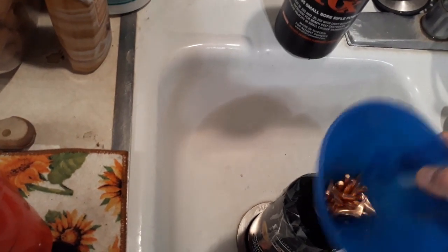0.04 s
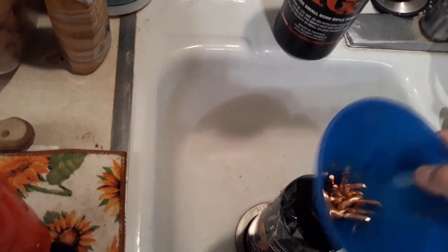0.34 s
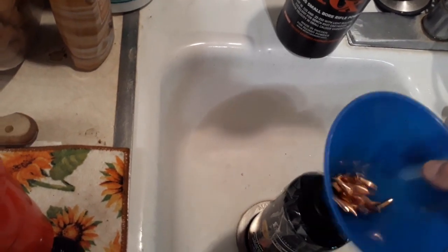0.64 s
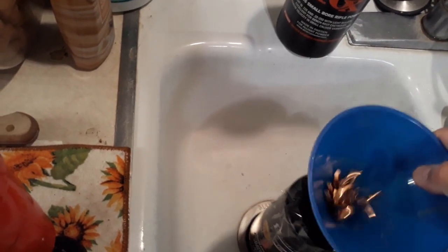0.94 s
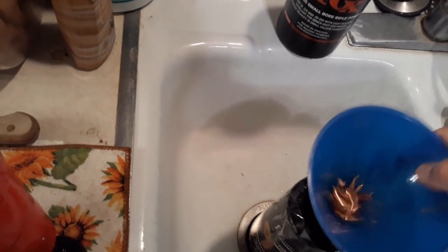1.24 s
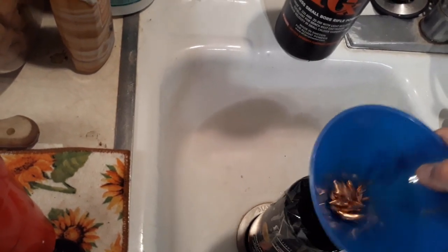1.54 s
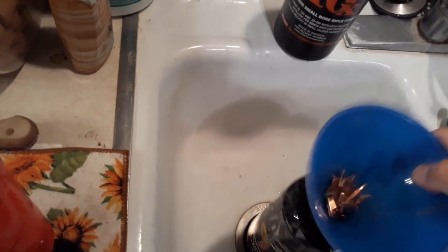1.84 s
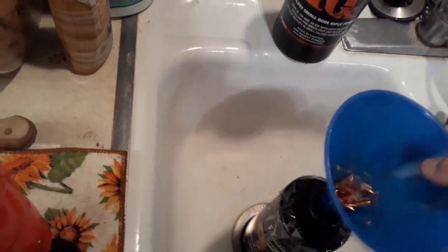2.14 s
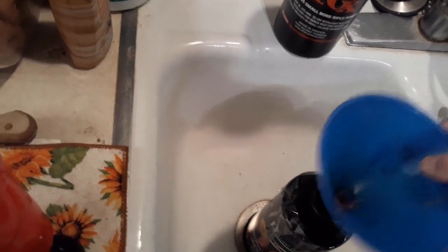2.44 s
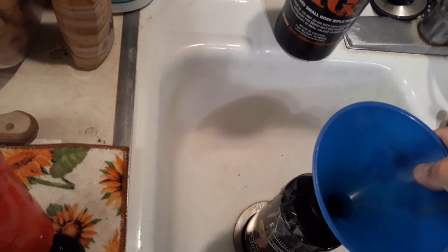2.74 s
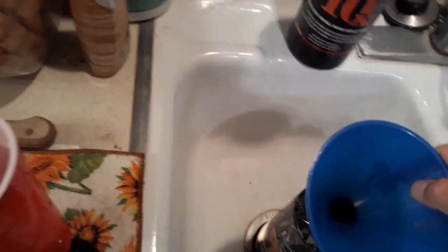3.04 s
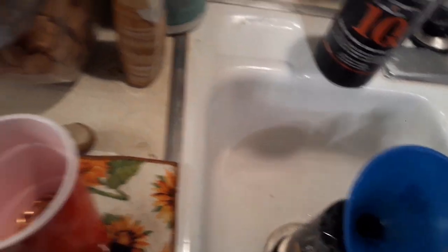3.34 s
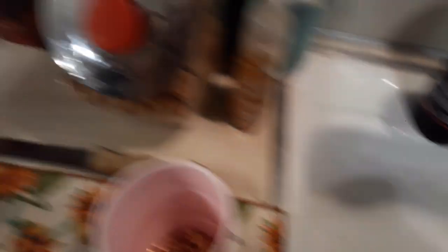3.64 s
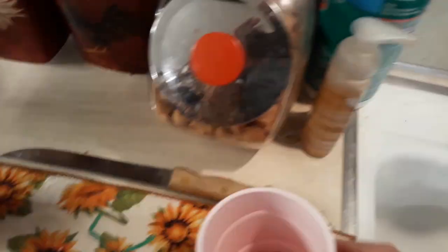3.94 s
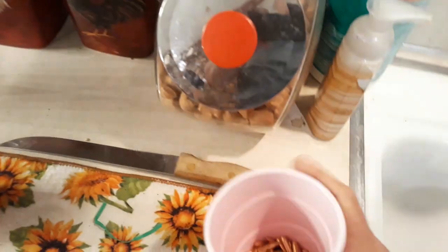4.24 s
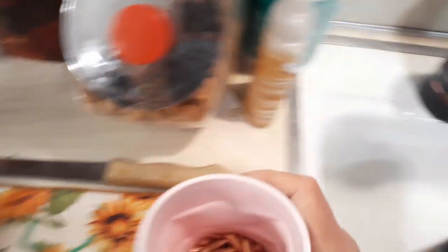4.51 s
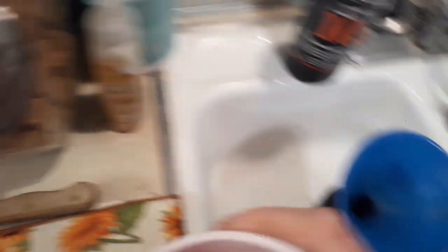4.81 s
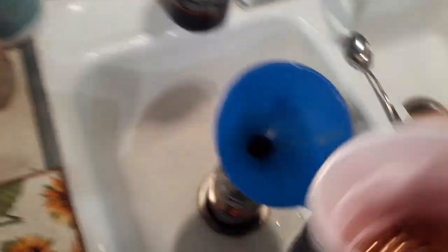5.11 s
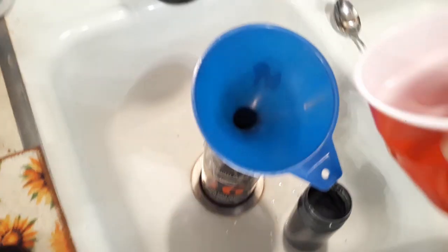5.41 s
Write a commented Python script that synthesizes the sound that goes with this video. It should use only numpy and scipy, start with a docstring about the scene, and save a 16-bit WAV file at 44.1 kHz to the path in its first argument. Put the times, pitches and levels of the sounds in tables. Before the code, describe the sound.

Small copper bullets are shaken in a plastic funnel about six times a second, rattling and clinking as some drop through and thump into a plastic bottle. The last ones stream out and the empty funnel gives a dull knock. After a short pause, a thin plastic cup is picked up, rustling, creaking and popping sharply. The microphone is close, over a sink in a quiet kitchen.

```python
"""A plastic funnel full of small copper bullets is shaken about six times a second over a plastic bottle
in a kitchen sink. Each shake throws the heap against the funnel's wall; bullets slip through the spout
and thump into the bottle until the funnel is empty. Then a hand picks up a thin plastic cup, which
rustles, creaks and pops as its wall buckles. A phone hears it from close by in a quiet room."""
import sys
import numpy as np
from scipy import signal
from scipy.fft import rfft, irfft, next_fast_len
from scipy.io import wavfile
from scipy.ndimage import uniform_filter1d

SR = 44100
rng = np.random.default_rng(int(sys.argv[2]) if len(sys.argv) > 2 else 0)


def dump(signal):
    """Clip the signal to [-1, 1] and save it as 16-bit WAV at the path in sys.argv[1]."""
    limited = np.clip(np.atleast_2d(signal).T, -1, 1)
    pcm = np.round(limited * 32767).astype(np.int16)
    wavfile.write(sys.argv[1], SR, pcm)


N = 245637
TIME = np.arange(N) / SR
RING_TIME = TIME[:16384]  # time axis of one short sound
EMPTYING_S, CUP_LIFTED_S = 2.22, 4.9  # the heap starts to stream out; the cup leaves its mat
PEAK_WIDTHS = 1.35  # a shake is loudest this many half lengths after its start
# a ring time (t60) is the seconds a sound takes to fade by 60 dB
TOUCH_T60, KNOCK_T60 = .026, .04

# shakes of the funnel (start [s], level [dB], half length [s], slap on the wall [dB])
SHAKES = [(0.015, -16, 0.017, -5), (.157, -19, 0.021, -1.5), (0.302, -16, 0.015, -27),
          (.466, -19, 0.021, -11.5), (0.622, -17.5, 0.023, -6.5), (.779, -17, 0.021, -4.5),
          (.955, -18, 0.021, -7), (1.116, -23, 0.031, -6), (1.298, -17, 0.023, -26.5),
          (1.437, -21.5, 0.036, -6), (1.616, -22, .019, -11), (1.759, -22, .022, -4.5),
          (1.939, -17.5, 0.021, -2.5), (2.097, -18, 0.035, -19), (2.281, -17, 0.028, -10.5),
          (2.488, -19.5, .036, -2), (2.634, -21, 0.019, -8)]
# bullets landing in the bottle (time [s], thump [dB], clack on the bullets inside [dB])
LANDINGS = [(0.159, -22.5, -20.5), (0.213, -33, -9.5), (.775, -25, -20), (1.116, -23, -26.5),
            (1.264, -33.5, -7.5), (2.099, -26, -17.5), (2.244, -32.5, -9.5), (2.274, -25.5, -18.5),
            (2.354, -26, -19.5), (2.402, -26, -1.5), (2.461, -26.5, -12.5), (2.553, -28, -19),
            (2.592, -22.5, -12.5), (2.662, -23, -8.5), (2.734, -36, -3), (2.777, -37.5, -11.5),
            (2.841, -29, -6.5), (2.886, -29, -14), (2.903, -35.5, -11)]
# the cup's wall buckles (time [s], level [dB], pitch [Hz], crack compared with the pop [dB])
POPS = [(4.541, -7, 742, 13.5), (4.672, -30.5, 735, 6.5), (5.211, -9, 768.5, -6.5), (5.267, -7.5, 755, 0.5),
        (5.523, -3, 786, 8)]
# tone of a dull knock on the bottle (frequency [Hz], level [dB])
BUMP_SPECTRUM = [(50, -5), (120, -10.5), (180, 7), (350, 0), (560, -1), (1300, -3.5), (2000, -9),
                 (3500, -3), (7000, -21.5), (9000, -37.5), (15500, -33)]
# tone of rubbing on the cup (frequency [Hz], level [dB])
RUB_SPECTRUM = [(100, -23), (480, -12.5), (750, 8.5), (950, -2), (1250, -7), (1800, 4), (2700, 3),
                (4000, 10.5), (7200, -0.5), (8800, -17), (15500, -10.5)]


def funnel(rest_per_s=1100, shake_per_s=1900, glints_per_s=700, heap_db=1.12, clack_db=12.5,
           tick_db=-13, wall_db=-14, clink_db=-8, chatter_db=-7, sparkle_db=-13):
    """Bullets tick and clink on each other and ring the wall; fast throws add a metallic sparkle."""
    # tone of the rattle (frequency [Hz], level [dB])
    rattle_spectrum = [(140, -25), (220, -1), (450, -1.5), (600, 0), (740, -5), (1000, 5), (1300, 1),
                       (1650, -3.5), (2300, 5), (3600, 6), (5600, -0.5), (7100, 2), (8600, -16),
                       (11000, -13.5), (15500, -8.5)]
    # tone of copper striking copper (frequency [Hz], level [dB])
    copper_spectrum = [(6000, -52.5), (9000, -10), (12000, -4.5), (15500, 2)]
    throw = swells([(s + PEAK_WIDTHS * width, db, width) for s, db, width, _ in SHAKES])
    speed = throw / throw.max()
    level = np.sqrt(throw + rolling() ** 2)
    heap = undb(heap_db) * contacts(rest_per_s + shake_per_s * speed, level, even_s=0.02)
    knocks = undb(clack_db) * hard_knocks()
    hits = heap + knocks
    # the faster the throw, the more the metal itself rings
    pings = clinks(heap * (.5 + np.sqrt(speed)))
    rattle = undb(tick_db) * hits + undb(wall_db) * funnel_wall(hits) + undb(clink_db) * pings
    rattle += undb(chatter_db) * chatter(heap, TOUCH_T60) + chatter(knocks, KNOCK_T60)
    glints = contacts(glints_per_s, level * np.sqrt(speed), even_s=0.025)
    sparkle = clinks(glints, lo_hz=9700, hi_hz=16500, phase_spread=0.52, t60=0.055)
    return shaped(rattle, rattle_spectrum) + undb(sparkle_db) * shaped(sparkle, copper_spectrum)


def rolling(roll_db=-12.5, lag_s=0.085, flow_db=-36.5, empty_s=2.91, settle_db_per_s=118.5):
    """Level of the bullets that roll on after each shake, then stream out and settle in the bottle."""
    shake_db = np.interp(TIME - lag_s, [row[0] for row in SHAKES], [row[1] for row in SHAKES])
    moving = np.hypot(undb(shake_db + roll_db), undb(flow_db) * (TIME > EMPTYING_S))
    return moving * undb(-settle_db_per_s * np.maximum(TIME - empty_s, 0))


def hard_knocks(count=4, slap_s=.004):
    """A few bullets slap the wall in a row as a shake starts; stray and landing ones clack singly."""
    # stray bullets fly up and knock on the funnel (time [s], level [dB])
    strays = [(.76, -16), (.823, -3.5), (.922, -15.5), (1.151, -5), (1.167, -4.5), (1.499, -3), (1.826, -6),
              (1.923, -12), (2.498, -1.5), (2.53, -7.5), (2.688, -14.5)]
    lags = slap_s * (np.arange(count) + rng.random((len(SHAKES), count)) / 2) / count
    slaps = [(s + lag, db - 10 * np.log10(count))
             for (s, _, _, db), row in zip(SHAKES, lags) for lag in row]
    return strikes(slaps + [(s, db) for s, _, db in LANDINGS] + list(strays))


def funnel_wall(hits, side_db=-5, places=10):
    """Each shake lands the heap on different places of the wall, each with its own mix of notes."""
    # notes of the funnel's wall (pitch [Hz], ring time [s], level [dB])
    notes = [(850, 0.055, -17), (941, 0.032, -8.5), (1055, 0.016, -15.5), (1275, 0.029, -10.5),
             (1533, 0.46, -20), (2320, 0.047, -18.5), (2556, 0.079, -10.5), (2863, 0.069, -7),
             (3410, .025, -5.5), (3680, 0.03, -3.5), (4090, 0.031, -3), (4555, 0.052, -5.5),
             (4750, .07, -10.5)]
    shake = np.searchsorted([row[0] for row in SHAKES], TIME)
    place = (3 * shake + rng.integers(0, 4, N)) % places
    out = 0
    for k in range(places):
        # the far side of the wall reaches the two ears out of step
        near, far = (ring(notes, detune=0.013, scatter_db=2, wave=wave) for wave in (np.cos, np.sin))
        out = out + convolve(hits * (place == k), both_ears(near, far, side_db))
    return out


def clinks(hits, lo_hz=2700, hi_hz=7500, phase_spread=0.7, uneven_db=4, t60=0.048, size=1280):
    """Each collision rings briefly at a pitch of its own, from its own place in the heap."""
    starts = np.flatnonzero(hits)
    pitches = lo_hz * (hi_hz / lo_hz) ** rng.random((len(starts), 1))
    phases = phase_spread * rng.standard_normal((len(starts), 2, 1))
    # a free bullet rings out, one wedged in the heap hardly does
    freedom = unit(undb(uneven_db * rng.standard_normal(len(starts)))) * np.sqrt(len(starts))
    decay = np.sqrt(2) * unit(fade(t60)[:size])
    out = np.zeros((2, N + size))
    for i, hz, phase, free in zip(starts, pitches, phases, freedom):
        tone = np.sin(np.float32(2 * np.pi * hz * RING_TIME[:size] + phase))
        out[:, i:i + size] += hits[i] * free * decay * tone
    return out[:, :N]


def spout(push_db=3, return_db=-1.5, return_s=.062, passing_db=13, scatter_db=3):
    """Bullets tap the narrow spout as each shake starts, on the swing back, and as they stream out."""
    # dull notes of the spout (pitch [Hz], ring time [s], level [dB])
    notes = [(319, 0.11, 1.5), (460, 0.017, -2.5), (574, 0.0718, 1)]
    taps = [(s, db + passing_db) for s, db, _ in LANDINGS if s > EMPTYING_S]
    scatter = scatter_db * rng.standard_normal((len(SHAKES), 2))
    for (s, db, width, _), (push_scatter, return_scatter) in zip(SHAKES, scatter):
        taps.append((s, db + push_db + push_scatter))
        taps.append((s + PEAK_WIDTHS * width + return_s, db + return_db + return_scatter))
    return convolve(strikes(taps), ring(notes))


def bottle(body_db=23.5, thud_db=5, air_db=-1, stir_db=-14, held_t60=0.9, held_pitch=.95,
           min_bounce_s=0.0086, bounce_db=-7):
    """Landing bullets thump the bottle and bounce once; some set the air inside singing."""
    # notes of the bottle's body (pitch [Hz], ring time [s], level [dB])
    body_notes = [(202, 0.12, -10.5), (224, 0.21, 3)]
    # notes of the air inside (pitch [Hz], ring time [s], level [dB])
    air_notes = [(960, .16, -5), (1400, .12, -11), (1805, .24, 0)]
    # bullets catch the neck and ring the air (time [s], level [dB])
    neck_hits = [(2.46, 3), (2.662, -2), (2.775, 2), (2.841, -4), (2.886, 1.5)]
    thumps = []
    for (s, db, _), late in zip(LANDINGS, rng.random(len(LANDINGS))):
        # the full funnel's weight lowers and shortens the notes
        pitch, damping = (held_pitch, fade(held_t60)) if s < EMPTYING_S else (1, 1)
        notes = [(hz * pitch, t60, note_db) for hz, t60, note_db in body_notes]
        for lag, gain_db in ((0, 0), (min_bounce_s * (1 + late), bounce_db)):
            thumps.append((s + lag, undb(db + gain_db) * ring(notes, detune=0.022) * damping))
    landings = strikes([(s, db) for s, db, _ in LANDINGS])
    thud = shaped(chatter(landings, t60=.07, side_db=-21), BUMP_SPECTRUM)
    # every landing also stirs the air a little
    blows = neck_hits + [(s, stir_db) for s, _, _ in LANDINGS]
    air = placed((s, undb(db) * ring(air_notes, detune=0.0027, scatter_db=-0.5)) for s, db in blows)
    return undb(thud_db) * thud + undb(body_db) * placed(thumps) + undb(air_db) * air


def funnel_bump(db=17, t60=.07):
    """The empty funnel is let go and knocks dully on the bottle's neck."""
    # the knock (time [s], level [dB])
    bumps = [(3.138, -29)]
    return undb(db) * shaped(chatter(strikes(bumps), t60), BUMP_SPECTRUM)


def cup_pops(wall_db=11, thump_db=5, crack_db=7, crack_t60=0.049, jolt_db=-5, jolt_t60=0.27):
    """The cup's thin wall snaps with a hollow pop and a crack that jolts the bullets inside."""
    # notes of the wall (multiple of the pop's pitch, ring time [s], level [dB])
    wall_notes = [(1, 0.03, 1), (1.02, .16, -14)]
    # tone of the crack (frequency [Hz], level [dB])
    crack_spectrum = [(60, -19), (300, -3.5), (480, -0.5), (720, 16), (1250, -6), (1900, 4), (3000, 1.5),
                      (3900, 5.5), (5300, 0), (7300, 1), (8900, -18.5), (15500, -16)]
    # notes of the base, on the mat and off it (pitch [Hz], ring time [s], level [dB])
    resting, lifted = [(638, 0.19, -10.5), (985, .07, -4)], [(580, 0.075, -2)]
    pops = []
    for s, db, hz, _ in POPS:
        notes = [(hz * ratio, t60, note_db) for ratio, t60, note_db in wall_notes]
        base = lifted if s > CUP_LIFTED_S else resting
        pops.append((s, undb(db) * ring(notes + base)))
    # the wall takes a moment to flip, so the pop is round; once lifted, it also thumps the hand
    wall = filtered(placed(pops), [520, 1080], "band")
    thump = filtered(strikes([(s, db) for s, db, _, _ in POPS if s > CUP_LIFTED_S]), [290, 500], "band")
    snaps = undb(crack_db) * strikes([(s, db + sharp_db) for s, db, _, sharp_db in POPS])
    # only the hardest snaps really unsettle the bullets
    jolts = snaps * np.sqrt(snaps / snaps.max())
    crack = chatter(snaps, crack_t60) + undb(jolt_db) * chatter(jolts, jolt_t60)
    return undb(wall_db) * wall + undb(thump_db) * thump + shaped(crack, crack_spectrum)


def cup_creaks(creak_db=8, gap_s=.0125, jitter_s=0.0012, scatter_db=2, detune=.02, push_s=0.0032):
    """Each creak is a nearly even run of soft slips, each a short swell of the wall's note."""
    # creaks of the wall (start [s], end [s], level [dB], pitch [Hz])
    creaks = [(5.152, 5.203, -29, 805), (5.227, 5.341, -23.5, 775), (5.363, 5.41, -33, 775)]
    push = (RING_TIME / push_s) ** 2 * np.exp(-2 * RING_TIME / push_s)
    slips = []
    for start, end, db, hz in creaks:
        for s in np.arange(start, end, gap_s):
            later, louder, higher = rng.standard_normal(3)
            note = unit(push * np.sin(2 * np.pi * hz * (1 + detune * higher) * RING_TIME))
            slips.append((s + jitter_s * later, undb(db + creak_db + scatter_db * louder) * note))
    return placed(slips)


def fingers(rub_db=-1, crinkle_db=16, grip_s=4.27, grip_db=-62.5, slips_per_s=650, slip_t60=.026):
    """Fingers stick and slip on the cup, and its wall crinkles under them."""
    # fingers slide (time [s], level [dB], half length [s])
    rubs = [(4.36, -46.5, 0.016), (4.417, -37, 0.011), (4.475, -47, 0.022), (4.58, -47, 0.027),
            (4.842, -49, 0.009), (5.38, -52.5, 0.028)]
    # the wall crinkles (time [s], level [dB])
    crinkles = [(4.276, -47), (4.292, -47), (4.349, -42), (4.367, -30.5), (4.382, -33.5), (4.408, -28.5),
                (4.462, -43), (4.523, -31), (4.906, -42), (4.932, -46.5), (5.019, -44.5)]
    holding = undb(grip_db) ** 2 * (TIME > grip_s)
    level = np.sqrt(swells(rubs, lean=0.24, edge=1.5) + holding)
    slips = undb(rub_db) * chatter(contacts(slips_per_s, level, even_s=0.04), slip_t60)
    return shaped(slips + undb(crinkle_db) * chatter(strikes(crinkles), KNOCK_T60), RUB_SPECTRUM)


def shifting_bullet(scrape_db=-7):
    """A bullet left in the cup shifts with a faint, dry clink."""
    # the bullet moves (time [s], level [dB])
    shifts = [(3.805, -41.5)]
    # notes of its clink (pitch [Hz], ring time [s], level [dB])
    notes = [(3160, .04, 0.95), (4183, .035, -0.5)]
    touch = strikes(shifts)
    clink = convolve(touch, ring(notes))
    return clink + undb(scrape_db) * shaped(chatter(touch, KNOCK_T60), RUB_SPECTRUM)


def sink(db=-2.5, cup_db=-14):
    """Sink and counter pass on each landing, and the pops of the standing cup, as a deep thud."""
    # tone of the thud (frequency [Hz], level [dB])
    thud_spectrum = [(20, -2.5), (45, -3.5), (80, -23), (160, -44), (600, -66.5)]
    blows = [(s, thump_db) for s, thump_db, _ in LANDINGS]
    blows += [(s, pop_db + cup_db) for s, pop_db, _, _ in POPS if s < CUP_LIFTED_S]
    return undb(db) * shaped(strikes(blows), thud_spectrum)


def kitchen(x, basin_db=-7.5, basin_t60=0.063, room_db=-16, room_t60=.25):
    """Sound reaches two microphones directly, then as quick basin echoes and a short room tail."""
    # how far the right microphone lags the left (frequency [Hz], phase [radians])
    phase_lags = [(1300, 0), (2300, -1.15), (3200, -2), (5000, -4), (7300, -5.5)]
    lag = np.interp(np.arange(N // 2 + 1) * SR / N, *np.transpose(phase_lags))
    # the microphones are close together, so low notes reach both alike
    side = filtered((x[0] - x[1]) / 2, 420, "high")
    x = both_ears(x.mean(axis=0), side, 0)
    direct = np.array([x[0], irfft(rfft(x[1]) * np.exp(-1j * lag), N)])
    echoes = [undb(basin_db) * burst(basin_t60) + undb(room_db) * burst(room_t60) for _ in range(2)]
    # low notes bend round the basin and are hardly thrown back
    return direct + convolve(x, filtered(echoes, 800, "high", order=1))


def room_tone(side_db=-10):
    """The low, faint rush of the kitchen, a little louder near the end."""
    # tone of the rush (frequency [Hz], level [dB])
    spectrum = [(25, -14), (55, -9), (90, -14.5), (180, -0.5), (240, -7), (320, 8.5), (450, -4),
                (700, -12.5), (2000, -25), (7000, -28), (9000, -31), (15500, -39)]
    # its loudness (time [s], level [dB])
    levels = [(0, -67), (3.6, -73.5), (4.2, -63), (4.9, -57.5), (5.57, -60)]
    noise = both_ears(*rng.standard_normal((2, N)), side_db)
    return undb(np.interp(TIME, *np.transpose(levels))) * shaped(noise, spectrum)


def contacts(per_s, level, even_s, spread_db=4.5):
    """Random impacts of uneven size that share the energy available in each moment."""
    hit = rng.random(N) < per_s / SR
    clicks = hit * rng.choice([-1, 1], N) * undb(spread_db * rng.standard_normal(N))
    power = np.abs(uniform_filter1d(clicks ** 2, int(even_s * SR)))
    return clicks * level / np.sqrt(power + 1e-9)


def chatter(hits, t60, side_db=-8):
    """Every impact breaks into a short burst of tiny bounces, a little different at each ear."""
    keep = np.exp(-2 * np.log(1000) / (t60 * SR))
    energy = signal.lfilter([1 - keep], [1, -keep], hits ** 2 + 1e-18)
    return np.sqrt(energy) * both_ears(*rng.standard_normal((2, N)), side_db)


def ring(notes, detune=0, scatter_db=0, wave=np.cos):
    """The fading notes of a struck thing; pitch and strength depend on where the blow lands."""
    out = 0
    for hz, t60, db in notes:
        higher, louder = rng.standard_normal(2)
        tone = wave(2 * np.pi * hz * (1 + detune * higher) * RING_TIME)
        out = out + undb(db + scatter_db * louder) * unit(tone * fade(t60))
    return out


def swells(rows, lean=.12, edge=2.3):
    """Energy of moves that rise faster than they fall (peak [s], level [dB], half length [s])."""
    power = np.zeros(N)
    for s, db, width in rows:
        near = np.abs(TIME - s) < 10 * width
        stage = (TIME[near] - s) / (width * (1 + lean * np.sign(TIME[near] - s)))
        power[near] += undb(db) ** 2 * np.exp(-.5 * np.abs(stage) ** edge)
    return power


def strikes(rows):
    """One click for each row of (time [s], level [dB])."""
    out = np.zeros(N)
    for s, db in rows:
        out[min(int(s * SR), N - 1)] += undb(db)
    return out


def placed(sounds):
    """Mix pairs of (start [s], sound)."""
    out = np.zeros(N + len(RING_TIME))
    for s, sound in sounds:
        start = int(np.clip(s * SR, 0, N))
        out[start:start + len(sound)] += sound
    return out[:N]


def shaped(x, spectrum, size=4096):
    """Give x the tone of a spectrum (frequency [Hz], level [dB])."""
    hz, db = np.transpose(spectrum)
    bins = np.maximum(np.arange(size // 2 + 1) * SR / size, 1)
    gains = undb(np.interp(np.log(bins), np.log(hz), db))
    # build a filter that rings only after a hit, never before it
    cepstrum = irfft(np.log(gains))
    cepstrum[1:size // 2] *= 2
    response = irfft(np.exp(rfft(cepstrum[:size // 2], size)))
    return convolve(x, unit(response))


def convolve(x, response):
    """Play x through a response; either may have two channels."""
    size = next_fast_len(N + len(RING_TIME), True)
    spectrum = rfft(np.float32(x), size) * rfft(np.float32(response), size)
    return irfft(spectrum, size)[..., :N].astype(float)


def filtered(x, hz, kind, order=2):
    """Keep what lies above a frequency ("high") or between two ("band")."""
    return signal.sosfilt(signal.butter(order, hz, kind, fs=SR, output="sos"), x)


def both_ears(mid, side, side_db):
    """Left and right from a shared part and an opposed part."""
    return mid + undb(side_db) * np.array([side, -side])


def burst(t60):
    """Fading noise of energy 1."""
    return unit(rng.standard_normal(len(RING_TIME)) * fade(t60))


def fade(t60):
    """A curve that falls by 60 dB in t60 seconds."""
    return np.exp(-np.log(1000) * RING_TIME / t60)


def unit(x):
    """Scale to energy 1."""
    return x / np.sqrt(np.sum(x ** 2, axis=-1, keepdims=True))


def undb(db):
    """Decibels to gain."""
    return 10 ** (np.asarray(db) / 20)


def scene(bass_cut_hz=175):
    """Everything happens at the sink, just below the phone; the small things give off little bass."""
    pouring = funnel() + spout() + bottle() + funnel_bump()
    cup = cup_pops() + cup_creaks() + fingers() + shifting_bullet()
    return kitchen(filtered(pouring + cup, bass_cut_hz, "high")) + sink() + room_tone()


def record(dry, left_db=-10, middle_hz=(700, 3500), top_hz=15900):
    """The left microphone hears more of the middle range; peaks are rounded and the top is cut."""
    middle = filtered(dry, middle_hz, "band", order=1)
    mics = dry + undb(left_db) * middle * np.array([[.5], [-.5]])
    return signal.sosfilt(signal.ellip(10, .2, 70, top_hz, fs=SR, output="sos"), np.tanh(mics))


dry = scene()
out = record(dry)
dump(out)
```